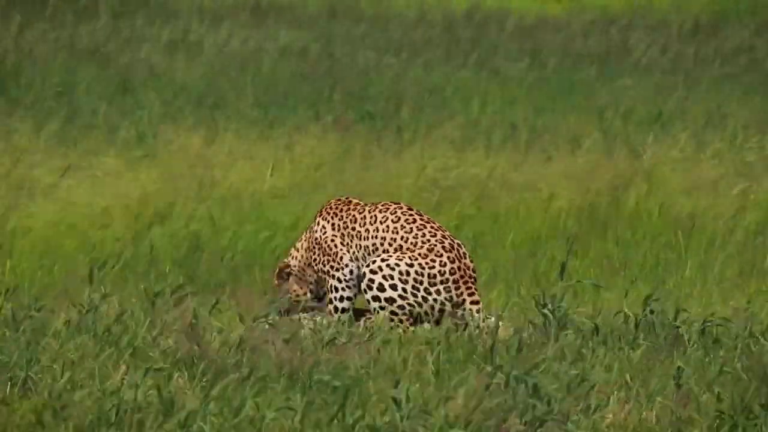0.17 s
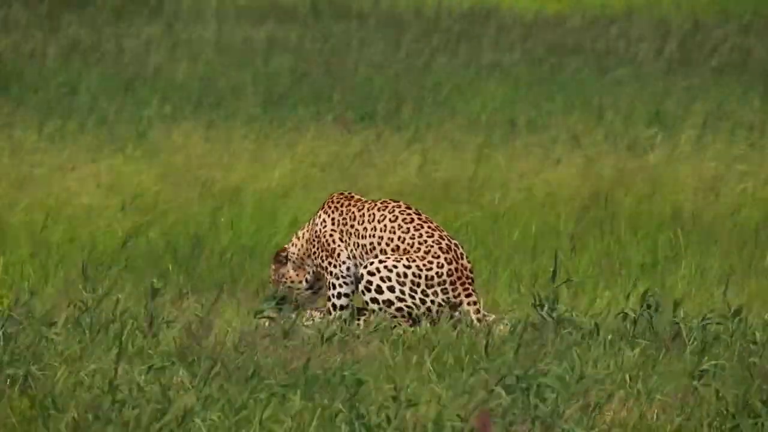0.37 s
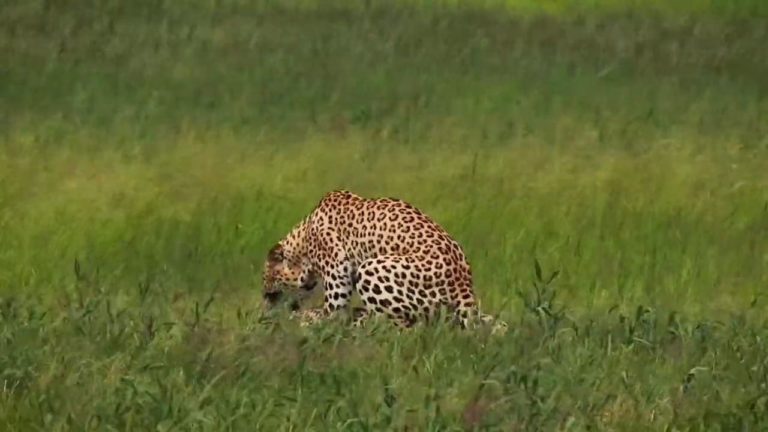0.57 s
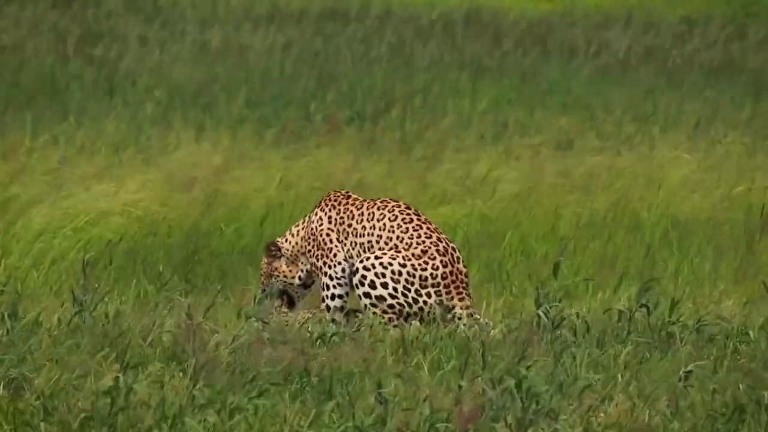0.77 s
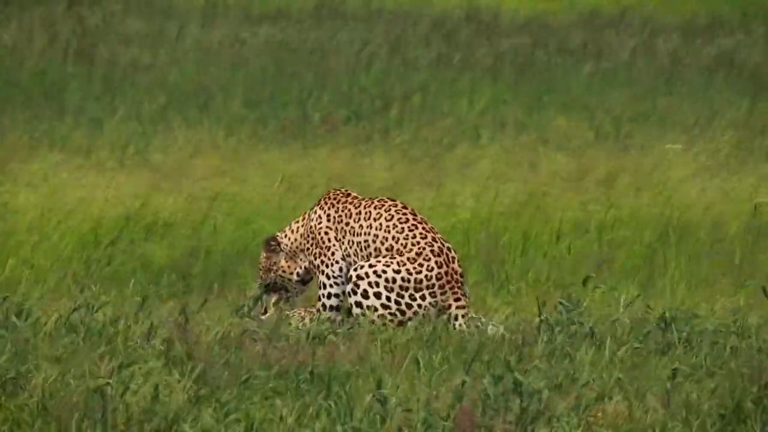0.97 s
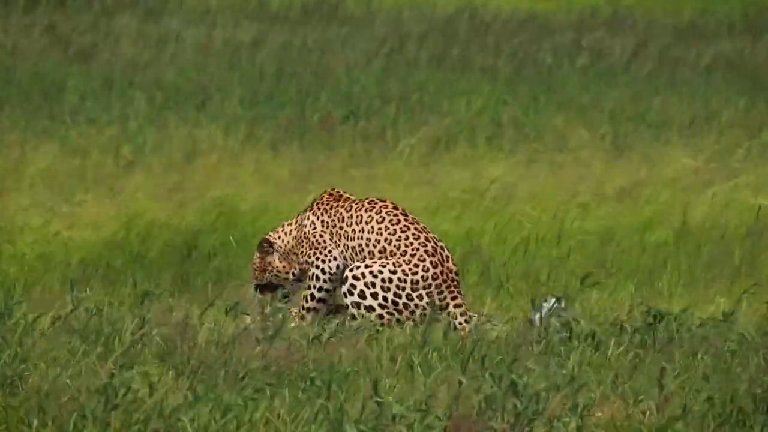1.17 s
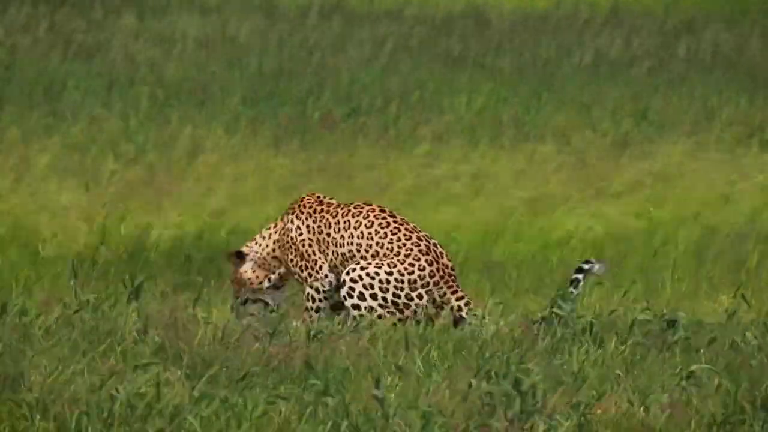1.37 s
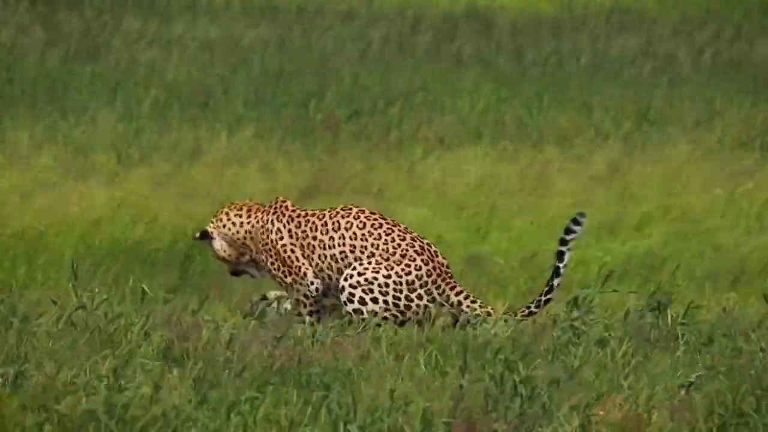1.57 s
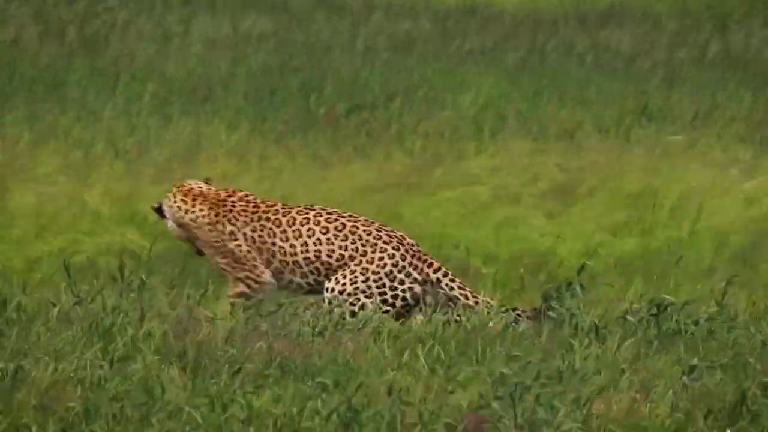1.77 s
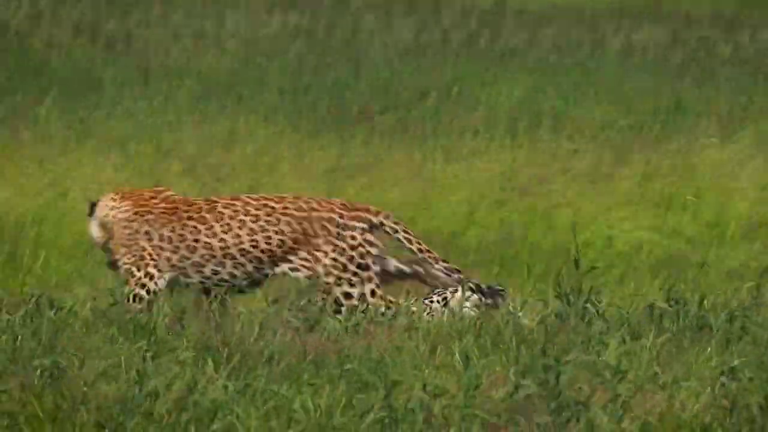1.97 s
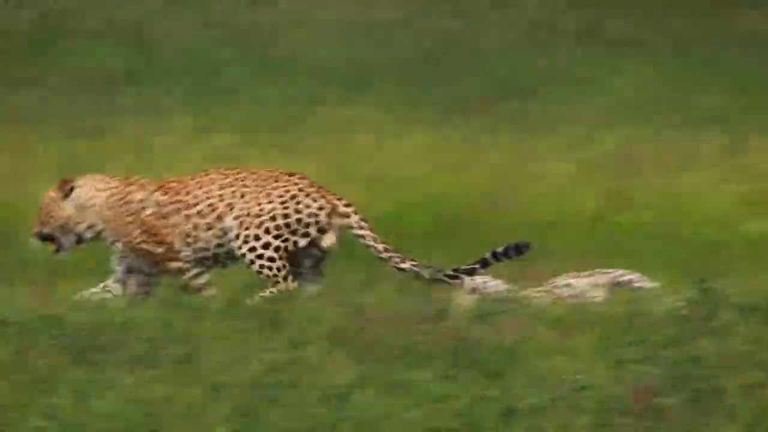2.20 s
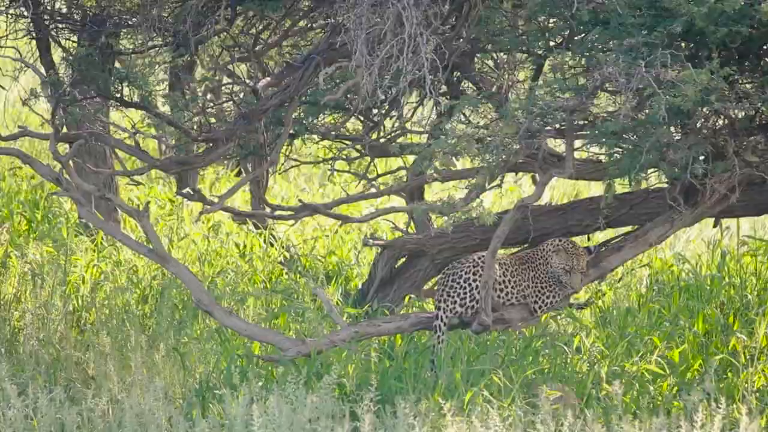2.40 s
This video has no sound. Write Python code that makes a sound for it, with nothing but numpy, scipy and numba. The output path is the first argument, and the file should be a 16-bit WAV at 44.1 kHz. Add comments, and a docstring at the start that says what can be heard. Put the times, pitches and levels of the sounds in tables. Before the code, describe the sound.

A leopard growls low and rattling, snores in air, growls again, then snarls in open grassland

```python
"""Leopards growling in open grassland

A long rattling growl, a hoarse indrawn snore, then a growl that sinks to a rumble and a last low grumble.
Slack vocal folds flap unevenly, and their pulses and puffs of air ring chest, throat and mouth resonances.
Shaped noise makes the air hissing past the teeth, an intake of breath and the swishing grass.
Small birds whistle on gliding sines and chip on bursts of noise, over a quiet bed of field noise.
At the very end a loud snarl bursts in: a low tone that drops in pitch under a blast of air."""
import sys
import numpy as np
from scipy import signal
from scipy.fft import rfft, irfft
from scipy.io import wavfile
from scipy.ndimage import uniform_filter1d
from numba import njit

SR = 44100
rng = np.random.default_rng(int(sys.argv[2]) if len(sys.argv) > 2 else 0)


def file_out(sig):
    """Save sig as 16-bit WAV at sys.argv[1]."""
    # one column per channel
    cols = np.atleast_2d(sig).T
    # limit, then scale
    lim = np.clip(cols, -1, 1)
    pcm = np.round(lim * 32767).astype(np.int16)
    wavfile.write(sys.argv[1], SR, pcm)


N = 107515
T = np.arange(N) / SR

# effort of each call [t/s, chest level/dB, throat level/dB, mouth level/dB]
FIRST_EFFORT = [(0, -43, -35.5, -39.5), (0.078, -58, -34, -47.5), (0.123, -35.5, -38.5, -40),
                (0.363, -35.5, -30, -35), (0.43, -37.5, -40.5, -45), (.59, -41, -36.5, -54),
                (.645, -42.5, -36.5, -43), (.72, -43.5, -37, -49), (0.797, -39, -29.5, -50),
                (0.872, -56, -38.5, -41.5), (0.908, -52, -36.5, -57), (0.923, -66, -82, -55)]
SNORE_EFFORT = [(0.937, -68, -48, -59), (0.979, -36, -69, -50.5), (1.01, -41.5, -68, -45),
                (1.051, -50, -46.5, -52), (1.071, -33, -45.5, -42.5), (1.118, -42, -34, -44),
                (1.213, -33, -38.5, -44.5), (1.277, -48, -58, -62)]
SECOND_EFFORT = [(1.278, -51, -45, -70), (1.333, -46, -42, -37), (1.353, -42, -28.5, -43.5),
                 (1.4, -37.5, -36, -45), (1.423, -45, -36.5, -44.5), (1.464, -34, -31, -43.5),
                 (1.488, -35.5, -32, -33.5), (1.56, -34, -34, -40), (1.599, -35, -40.5, -39),
                 (1.649, -42, -45, -49.5), (1.8, -42.5, -67, -66.5), (1.99, -46, -62, -74),
                 (2.061, -56.5, -92, -89)]
GRUMBLE_EFFORT = [(2.277, -76, -86, -80), (2.295, -50, -53, -49.5), (2.365, -40, -66, -55),
                  (2.4, -64, -49, -54)]
# tuning of the two main low resonances [t/s, chest f/Hz, throat f/Hz]
BODY_TUNING = [(.1, 129, 363), (.2, 173, 344), (.36, 156, 377), (.66, 133, 340), (0.799, 158, 386),
               (1.341, 151.8, 317.5), (1.59, 177.5, 342), (1.7, 135.8, 310.2), (1.82, 101, 290),
               (2.351, 112, 266)]
# mouth resonances, levels relative to one another [f/Hz, width/Hz, level/dB]
FIRST_MOUTH = [(613, 155, 17), (814, 180, 14), (1062, 244, 12), (1516, 158, 6.5), (2040, 120, 2.5),
               (2440, 100, -3.5)]
SNORE_MOUTH = [(820, 122, 4), (1145, 180, 2.5), (1525, 190, -4.5), (2010, 107, -6.5), (2350, 170, -11.5)]
SECOND_MOUTH = [(684, 140, 1), (954.7, 204, 16.5), (1520, 118, 11.5), (1942, 63.3, 0), (2499, 270, -27)]
# upper throat resonance that climbs late in the first growl [t/s, level/dB, f/Hz]
THROAT_CLIMB = [(.73, -45, 476), (.8, -38, 484), (.86, -58, 665)]
# clear chest tone as the second growl sinks [t/s, level/dB]
MOAN_LEVEL = [(1.44, -37), (1.6, -35.5), (1.69, -35), (1.76, -41.5)]
CHEST_WIDTH_HZ, THROAT_WIDTH_HZ, CLIMB_WIDTH_HZ = 68.4, 83, 40  # width of each filter pass
MOAN_WAVER = 0.034  # spread of the pitch drift, as a share of the pitch
VOICE_TOP_HZ = 2670


def leopards():
    """The flapping folds excite tuned body cavities; each call has its own effort and mouth shape."""
    low, bright = folds()
    s, chest_hz, throat_hz = np.array(BODY_TUNING).T
    chest_hz = np.interp(T, s, chest_hz)
    chest = ring(low, chest_hz, CHEST_WIDTH_HZ, skirt=0.032)
    belly = undb(-0.5) * ring(low, hz=77.6, width_hz=40)
    throat = ring(low, np.interp(T, s, throat_hz), THROAT_WIDTH_HZ, skirt=0.14)
    # a weak neck resonance between chest and throat, in opposite polarity
    throat = throat - undb(-12.5) * ring(low, hz=246, width_hz=66)

    first = growl(bright, FIRST_EFFORT, chest, throat, FIRST_MOUTH)
    climb_s, _, climb_hz = np.array(THROAT_CLIMB).T
    climb = ring(low, np.interp(T, climb_s, climb_hz), CLIMB_WIDTH_HZ)
    climb = steady(climb) * curve(THROAT_CLIMB)

    snore_chest = belly - ring(low, hz=184, width_hz=196)
    snore_throat = ring(low, hz=274, width_hz=70)
    snore = growl(bright, SNORE_EFFORT, snore_chest, snore_throat, SNORE_MOUTH)

    second = growl(bright, SECOND_EFFORT, chest + belly, throat, SECOND_MOUTH)
    grumble = growl(bright, GRUMBLE_EFFORT, chest + belly, throat, SECOND_MOUTH)
    moan_hz = chest_hz * (1 + MOAN_WAVER * waver(0.0085))
    moan = np.sqrt(2) * curve(MOAN_LEVEL) * glide(moan_hz)  # sqrt(2): levels are rms

    voice = first + climb + snore + second + grumble + moan
    return signal.sosfilt(signal.butter(3, VOICE_TOP_HZ, fs=SR, output="sos"), voice)


# hardest flaps of the folds [t/s, strength level/dB in the bright drive]
HARD_FLAPS = [(0.118, 2), (.198, -5.5), (0.219, -2.5), (0.264, 2), (.476, 4.5), (0.635, -2.5), (.854, 3.5),
              (0.874, -1.5), (1.132, -3), (1.198, 4), (1.345, 2), (1.355, 5), (1.41, 11), (1.422, 11),
              (1.434, 5.5), (1.531, 5), (1.55, 12), (1.573, 8.5), (2.387, 13.5)]
FLAP_RATE_HZ, FLAP_JITTER = 88, 0.22  # median rate; log spread of the gaps
FLAP_SCATTER_DB, WEAK_FLAP_DB = 5, -1.5  # random softening; every second flap is weaker
FLAP_PAUSE_S = 0.011  # no ordinary flap this long before a hard one, or half as long after
LOW_ACCENT = 0.61  # share of a flap's dB in the low drive: hard flaps are brighter
PUFF_S, PUFF_DB, AIR_DB = 0.004, -22, -31  # decay of each puff; its level; steady air


def folds():
    """Slack folds flap at uneven gaps, each pulse with a decaying puff of air; returns low and bright drive."""
    chance = rng.standard_normal((400, 2))
    gaps = np.exp(FLAP_JITTER * chance[:, 0]) / FLAP_RATE_HZ
    times = np.cumsum(gaps)
    hard_s, hard_db = np.array(HARD_FLAPS).T
    since = times[:, None] - hard_s
    free = np.all((since < -FLAP_PAUSE_S) | (since > FLAP_PAUSE_S / 2), axis=1)

    soft_db = FLAP_SCATTER_DB * (np.minimum(chance[free, 1], 1) - 1)
    soft_db += WEAK_FLAP_DB * (np.flatnonzero(free) % 2)
    at = (np.r_[times[free], hard_s] * SR).astype(int)
    db = np.r_[soft_db, hard_db]
    air = rng.standard_normal(N)

    def drive(size):
        """Pulses plus the air they let through."""
        pulses = np.bincount(at[at < N], size[at < N], N)
        puffs = signal.lfilter([1], [1, -np.exp(-1 / (PUFF_S * SR))], pulses)
        return pulses + (undb(PUFF_DB) * puffs + undb(AIR_DB)) * air

    return drive(undb(LOW_ACCENT * db)), drive(undb(db))


MOUTH_WANDER_HZ, MOUTH_WANDER_S = 42, 0.034  # tongue and jaw keep shifting each resonance
MOUTH_SWELL_S = 0.26  # the mouth keeps slower accents than chest and throat


def growl(source, effort, chest, throat, mouth):
    """Wandering mouth resonances join chest and throat, each evened out and then driven by its effort."""
    bright = 0
    for k, (hz, width, db) in enumerate(mouth):
        wandering_hz = hz + MOUTH_WANDER_HZ * waver(MOUTH_WANDER_S)
        polarity = (-1) ** (k + 1)  # neighbouring resonances oppose each other
        bright = bright + polarity * undb(db) * ring(source, wandering_hz, width, skirt=0.038)
    return (steady(chest) * curve(effort, 1)
            + steady(throat) * curve(effort, 2)
            + steady(bright, MOUTH_SWELL_S) * curve(effort, 3))


# spectrum of the snarl's air [f/Hz, relative level/dB]
SNARL_COLOUR = [(400, 9), (900, 3.5), (2000, -4), (3400, 0.5), (7000, -3), (10000, -7), (15000, -11)]
SNARL_S, SNARL_DB, SNARL_ATTACK_S, SNARL_DECAY_S = 2.413, -3.5, 0.005, 0.018
SNARL_HZ, SNARL_DROP_HZ, SNARL_SETTLE_S = 170.4, 160, 0.0033  # final pitch; extra at the start; its decay
SNARL_AIR_DB = -26


def snarl():
    """A sudden bark: a strong low tone falls to its resting pitch under a steady blast of air."""
    age = np.maximum(T - SNARL_S, 0)
    started = age > 0
    hz = (SNARL_HZ + SNARL_DROP_HZ * np.exp(-age / SNARL_SETTLE_S)) * started
    swell = np.minimum(age / SNARL_ATTACK_S, 1) ** 2 * np.exp(-age / SNARL_DECAY_S)
    tone = -glide(hz) * swell * undb(SNARL_DB)
    air = noise(SNARL_COLOUR) * started * undb(SNARL_AIR_DB)
    return tone + place(air, -0.5) + scatter(air, 0.0014, db=-16.5)


# air past the teeth, before the treble lift in scene() [t/s, level/dB]
HISS_LEVEL = [(.93, -71), (1.03, -70.5), (1.14, -61), (1.43, -73), (1.48, -53), (1.56, -54.5),
              (1.66, -62.5), (1.76, -76)]
# its spectrum [f/Hz, relative level/dB]
HISS_COLOUR = [(1500, -1), (2500, 6.5), (3800, -14), (7200, -24), (8100, 1), (10400, -3.5), (11500, -28)]


def teeth_hiss():
    """Turbulent air past the teeth: coloured noise along a level curve."""
    return noise(HISS_COLOUR) * curve(HISS_LEVEL)


# soft rush of air drawn in between the first growl and the snore [t/s, width/s, level/dB]
INTAKE_SWELL = [(.97, 0.13, -66)]


def intake():
    """Indrawn air: one soft swell of band-passed noise."""
    rush = ring(rng.standard_normal(N), hz=4640, width_hz=2600)
    return unit(rush) * bursts(INTAKE_SWELL)


# swishes of grass, before the treble lift in scene() [t/s, width/s, level/dB]
GRASS_SWISHES = [(.035, 0.017, -55), (.088, 0.0081, -54), (.133, 0.0096, -50.5), (1.79, 0.011, -53),
                 (1.843, 0.014, -53.5), (1.893, 0.012, -52), (1.928, 0.0028, -52.5), (1.944, 0.0068, -50.5)]
# their spectrum [f/Hz, relative level/dB]
GRASS_COLOUR = [(1200, -5), (6000, -3), (7300, -15), (8700, 4), (10600, -6.5), (12500, -39)]
CRACKLE_DB, CRACKLE_S = 5.5, 0.00051  # spread and smoothing of the blade ticks


def grass_swishes():
    """Brushed grass: swells of coloured noise, roughened by fast level flutter as single blades tick."""
    crackle = unit(undb(CRACKLE_DB * waver(CRACKLE_S)))
    return noise(GRASS_COLOUR) * bursts(GRASS_SWISHES) * crackle


# whistled notes [t/s, length/s, first f/Hz, middle f/Hz, last f/Hz, level/dB]
BIRD_NOTES = [(0.694, 0.042, 3470, 3040, 2660, -62), (0.743, 0.13, 3350, 3180, 3190, -61),
              (0.99, 0.079, 3070, 3590, 3590, -56), (1.209, 0.084, 3100, 3475, 3470, -55),
              (1.269, 0.017, 3700, 3020, 2350, -56.5), (1.376, 0.087, 3040, 3430, 3010, -56),
              (1.65, 0.09, 1910, 1936, 2350, -58), (1.77, 0.019, 3950, 3720, 3610, -47),
              (1.788, 0.066, 2725, 2575, 2510, -54), (1.805, 0.015, 5270, 4900, 4700, -53.5),
              (1.84, 0.02, 3720, 3330, 2570, -47.5), (1.968, 0.031, 3010, 3635, 2330, -50.5),
              (1.995, 0.049, 2510, 2814, 2490, -51.5), (2.202, 0.072, 4440, 3450, 3260, -49.5),
              (2.218, 0.038, 4080, 4100, 4330, -54), (2.261, 0.019, 3260, 2770, 2130, -53.5),
              (2.299, 0.11, 3270, 3104, 2800, -55)]
# harsh chips [t/s, width/s, level/dB]
BIRD_CHIPS = [(.685, 0.0088, -58.5), (1.76, 0.0043, -57), (1.967, 0.005, -49), (2.014, 0.0064, -53),
              (2.058, 0.0046, -54), (2.197, 0.0087, -57)]
BIRD_FLUTTER_DB, BIRD_WAVER = 3, 0.01435  # spread of level; spread of pitch as a share


def birds():
    """Sine whistles arch through three pitches with fluttering level; chips are short band-passed noise."""
    song = unit(ring(rng.standard_normal(N), hz=3800, width_hz=1600)) * bursts(BIRD_CHIPS)
    drift = 1 + BIRD_WAVER * waver(0.00445)
    flutter = undb(BIRD_FLUTTER_DB * waver(0.003))
    for s, length, first, middle, last, db in BIRD_NOTES:
        progress = np.clip((T - s) / length, 0, 1)
        arch = np.polyfit([0, 0.5, 1], [first, middle, last], 2)
        hz = np.polyval(arch, progress) * drift
        swell = np.sqrt(2 * np.abs(np.sin(np.pi * progress)))
        song = song + undb(db) * flutter * swell * glide(hz)
    return song


# spectrum of the open field [f/Hz, relative level/dB]
FIELD_COLOUR = [(20, -7), (80, -17.5), (534, -34.5), (1100, -41), (2150, -37), (3640, -42.5),
                (15500, -50.5)]
FIELD_DB, FIELD_WIDE_DB, FIELD_WIDE_HZ = -53.5, -52, 400


def field():
    """Quiet field air: noise common to both sides, plus separate noise per side with its lows thinned."""
    highpass = signal.butter(1, FIELD_WIDE_HZ, "high", fs=SR, output="sos")
    wide = signal.sosfilt(highpass, [noise(FIELD_COLOUR), noise(FIELD_COLOUR)])
    return undb(FIELD_DB) * noise(FIELD_COLOUR) + undb(FIELD_WIDE_DB) * wide


def scatter(x, decay_s, db):
    """A short diffuse echo off grass and bushes: decaying noise tails, different on each side."""
    t = T[:SR // 3]
    tails = rng.standard_normal((2, len(t))) * np.exp(-t / decay_s)
    tails /= np.sqrt(np.sum(tails ** 2, axis=1, keepdims=True))
    return undb(db) * signal.fftconvolve(x[None], tails, axes=1)[:, :N]


def place(x, pan_db):
    """Pan by left minus right level; negative sits to the right."""
    return x * undb(np.array([[pan_db], [-pan_db]]) / 2)


def undb(db):
    """Decibels to gain."""
    return 10 ** (np.asarray(db) / 20)


def unit(x):
    """Scale to rms 1."""
    return x / np.sqrt(np.mean(x ** 2))


def steady(x, span_s=0.031):
    """Even out slow swells but keep the single flaps."""
    size = max(int(span_s * SR / 2), 8)
    power = uniform_filter1d(uniform_filter1d(x ** 2, size), size)
    return x / np.sqrt(np.abs(power) + 1e-4 * np.mean(x ** 2))  # small floor for the quiet spots


def curve(rows, column=1):
    """Gain along a dB curve, silent outside it."""
    rows = np.array(rows)
    return undb(np.interp(T, rows[:, 0], rows[:, column], left=-200, right=-200))


def bursts(rows):
    """Short bell-shaped swells."""
    return sum(undb(db) * np.exp(-0.5 * ((T - s) / width) ** 2) for s, width, db in rows)


def glide(hz):
    """A sine that follows a moving pitch."""
    return np.sin(2 * np.pi * np.cumsum(hz) / SR)


def waver(span_s):
    """Smooth random drift with spread 1."""
    size = int(span_s * SR)
    return unit(uniform_filter1d(uniform_filter1d(rng.standard_normal(N), size), size))


def noise(colour):
    """Noise of rms 1 with a given spectrum, interpolated over log frequency."""
    hz, db = np.array(colour).T
    f = np.maximum(np.fft.rfftfreq(N, 1 / SR), 1)
    gain = undb(np.interp(np.log(f), np.log(hz), db))
    return unit(irfft(rfft(rng.standard_normal(N)) * gain, N))


@njit
def svf(x, hz, width):
    """State-variable band-pass with a moving centre, gain 1 at the centre."""
    y, band, low = np.empty(len(x)), 0., 0.
    for i in range(len(x)):
        g, k = np.tan(np.pi * hz[i] / SR), width / hz[i]
        v = (band + g * (x[i] - low)) / (1 + g * (g + k))
        band, low, y[i] = 2 * v - band, low + 2 * g * v, k * v
    return y


def ring(x, hz, width_hz, skirt=0.):
    """A steep resonance of two band-passes; skirt mixes in the gentler flanks of one."""
    hz = hz + np.zeros(N)
    once = svf(x, hz, float(width_hz))
    twice = svf(once, hz, float(width_hz))
    return skirt * once + (1 - skirt) * twice


TREBLE_DB = 3  # lift of hiss and grass


def scene():
    """Growls, breath and grass a little to the right, snarl and birds near the middle, field all round."""
    cats, song = leopards(), birds()
    treble = undb(TREBLE_DB) * (teeth_hiss() + grass_swishes()) + intake()
    voices = place(cats, -2.43) + scatter(cats, 0.058, db=-18)
    rustle = place(treble, -2.5) + scatter(treble, 0.004, db=-2)
    flock = song + scatter(song, 0.026, db=-10)
    return voices + snarl() + rustle + flock + field()


def record(dry):
    """A steep low-pass cuts the treble above 15.75 kHz."""
    return signal.sosfilt(signal.ellip(10, 0.2, 80, 15750, fs=SR, output="sos"), dry)


dry = scene()
out = record(dry)
file_out(out)
```